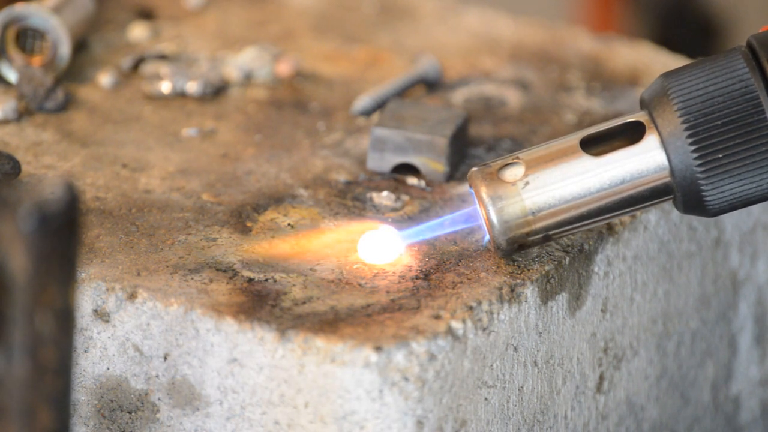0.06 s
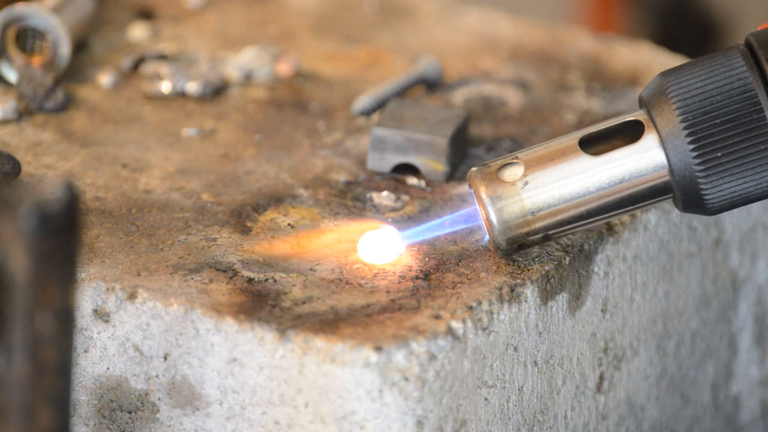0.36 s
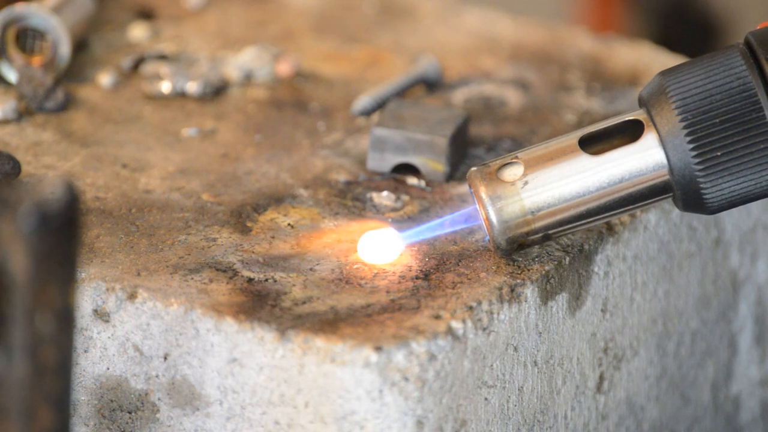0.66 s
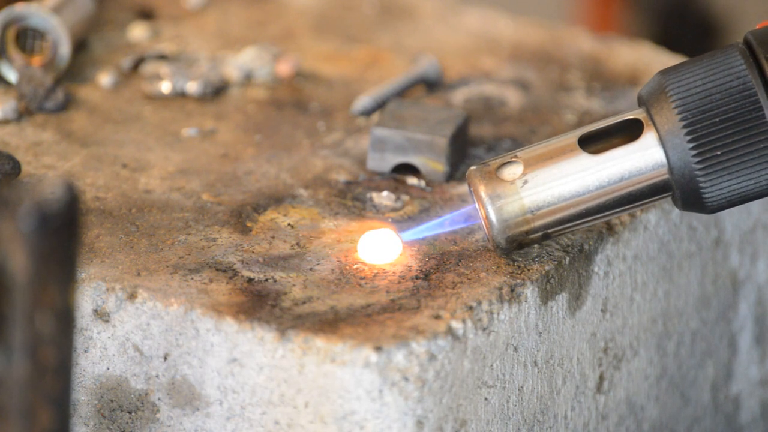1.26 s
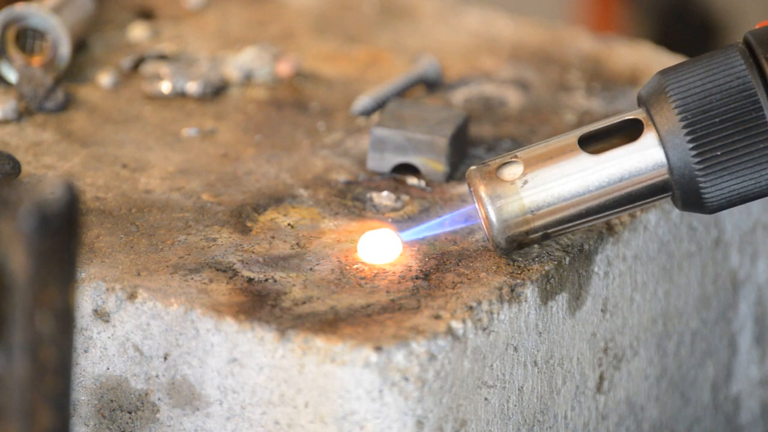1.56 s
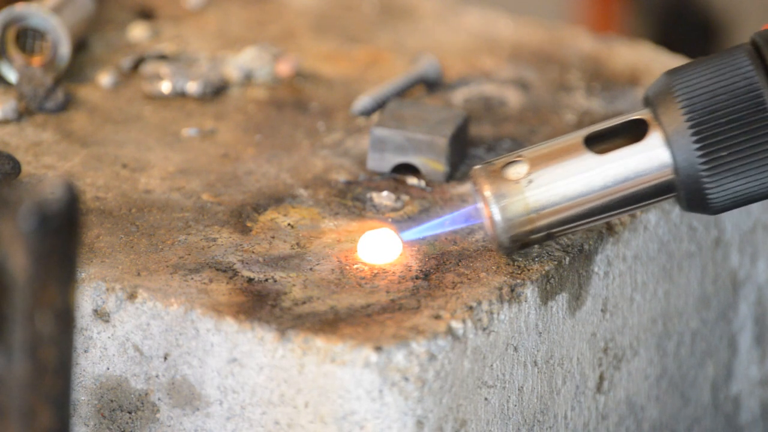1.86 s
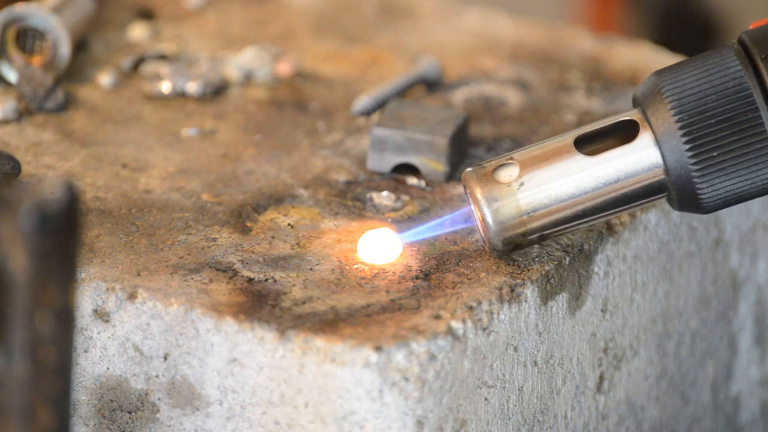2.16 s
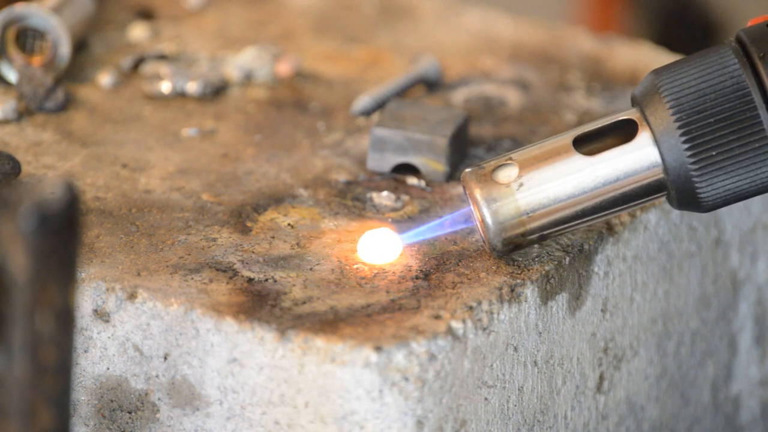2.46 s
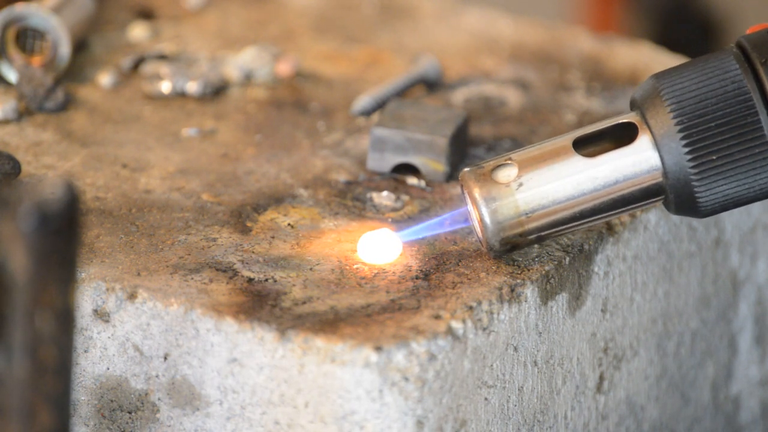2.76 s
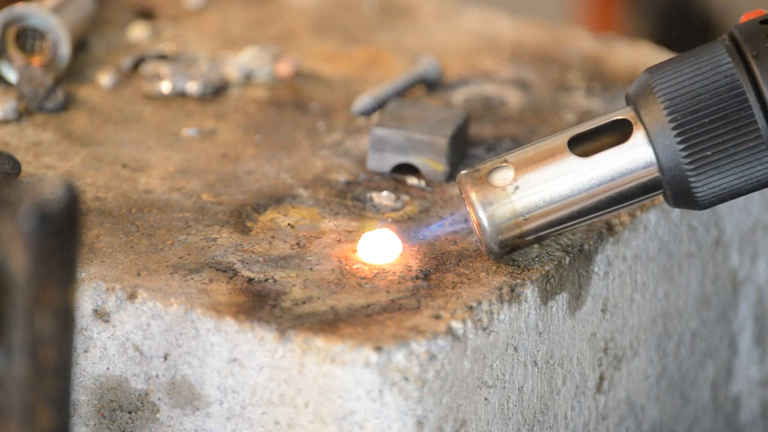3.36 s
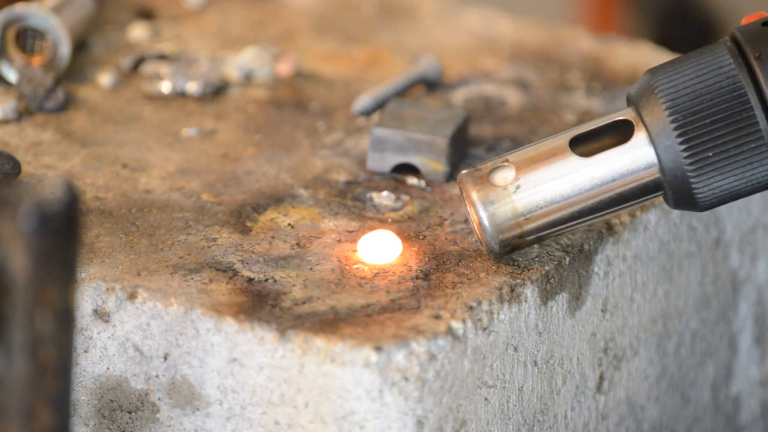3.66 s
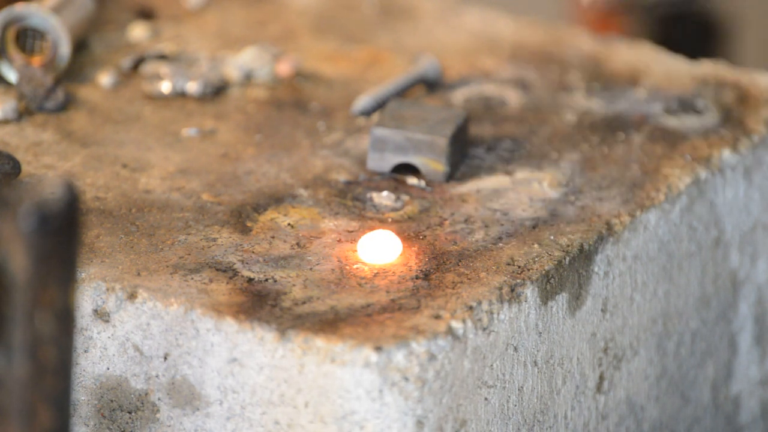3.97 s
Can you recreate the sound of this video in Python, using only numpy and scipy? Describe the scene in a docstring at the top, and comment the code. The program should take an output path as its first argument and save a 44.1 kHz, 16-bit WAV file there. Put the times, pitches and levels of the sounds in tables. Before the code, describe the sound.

Close up in a workshop, a gas torch flame rushes, eases to a steady hiss, swells briefly and slowly grows rougher. A sharp metallic click and a small pop end it, leaving quiet ventilation and a low hum.

```python
"""A handheld butane torch heats a bead of metal on a block, close to a mono microphone in a workshop.
From the start, over ventilation and a low hum, the gas jet hisses through the resonant burner tube
and the flame rushes loudly where it spills over the bead. Within a second it settles; it flares
briefly at 1.7 s, then slowly builds a roar. At 3.3 s the valve snaps shut and the flame pops out,
leaving the ventilation and the hum."""
import sys
import numpy as np
from scipy import signal
from scipy.fft import rfft, irfft
from scipy.io import wavfile

SR = 44100
rng = np.random.default_rng(int(sys.argv[2]) if len(sys.argv) > 2 else 0)


def generate_wav(signal):
    """Clip the signal to [-1, 1] and save it as 16-bit WAV at the path in sys.argv[1]."""
    frames = np.transpose(np.atleast_2d(signal))
    scaled = np.clip(frames, -1, 1) * 32767
    pcm = np.round(scaled).astype(np.int16)
    wavfile.write(sys.argv[1], SR, pcm)


N = 176400
T = np.arange(N) / SR
HZ = np.maximum(np.arange(N // 2 + 1) * SR / N, 1)
STOP_S, SHUT_S = 3.3238, 3.325  # the valve hits its stop; the gas is cut


def from_db(db):
    """Amplitude grows tenfold for every 20 dB."""
    return 10 ** (np.asarray(db) / 20)


def level(rows):
    """An envelope: gain interpolated in decibels over time."""
    return from_db(np.interp(T, *np.transpose(rows)))


def colour(points):
    """A spectral envelope: gain interpolated in decibels over log frequency."""
    hz, db = np.transpose(points)
    return from_db(np.interp(np.log(HZ), np.log(hz), db))


def bell(hz, width):
    """The Lorentzian curve of one resonance, 1 at its peak."""
    return 1 / (1 + (2 * (HZ - hz) / width) ** 2)


def resonances(rows):
    """Peaks and notches in cascade: their decibels add."""
    return from_db(sum(db * bell(hz, width) for hz, width, db in rows))


def noise(response):
    """Source and filter: white noise shaped by a frequency response, at unit power."""
    shaped = irfft(rfft(rng.standard_normal(N)) * response, N)
    return shaped / np.sqrt(np.mean(shaped ** 2) + 1e-20)


def flutter(depth_db, corner_hz=32):
    """Random amplitude modulation: a gain that wavers with low-passed noise."""
    return from_db(depth_db * noise(bell(0, 2 * corner_hz)))


def fade(start, db_per_s):
    """Full level until the start, then exponential decay."""
    return from_db(-db_per_s * np.maximum(T - start, 0))


def decay(start, t60):
    """Free decay: a sudden onset, then a fall of 60 dB every t60 seconds."""
    return (T >= start) * 1000. ** (-np.maximum(T - start, 0) / t60)


def mode(start, hz, t60):
    """A struck mode vibrates as a damped sinusoid."""
    return decay(start, t60) * np.sin(2 * np.pi * hz * (T - start))


def workshop():
    """Ventilation gives broadband noise; its fan motor hums in narrow, wavering bands."""
    # motor hum: (frequency [Hz], width [Hz], level [dB])
    hum_bands = [(57.5, 4.5, -88), (121.3, 4.4, -71), (233, 19, -75)]
    # ventilation spectrum: (frequency [Hz], relative level [dB])
    spectrum = [(20, -18), (42, -8.5), (60, 2), (110, 1), (165, -3.5), (240, -0.5), (400, -3.5), (600, -5),
                (880, -1), (1400, -4.5), (1850, -5), (2300, -11), (3700, -15.5), (7500, -17), (9600, -15),
                (12000, -22.5), (15500, -29)]
    hum = sum(from_db(db) * noise(bell(hz, width)) for hz, width, db in hum_bands)
    return hum + from_db(-59.5) * flutter(depth_db=0.7) * noise(colour(spectrum))


def bench_reflections(echo_db=-13, decay_s=.016, ceiling_db=3):
    """Interference of direct sound with echoes from block and bench ripples the spectrum."""
    echoes = rng.standard_normal(N) * np.exp(-T / decay_s)
    echoes /= np.linalg.norm(echoes)
    ripple = np.abs(1 + from_db(echo_db) * rfft(echoes))
    return np.minimum(ripple, from_db(ceiling_db))


def burner_tube():
    """Resonances of the tube and the space round it filter the jet and the flame."""
    # lower resonances: (frequency [Hz], width [Hz], gain [dB])
    low_modes = [(655, 18, 4), (722, 17, 4), (928, 19, 4.5), (1023, 19, 5), (1087, 34, 7), (1200, 33, 4),
                 (1348, 27, 10), (1509, 27, 11), (1600, 11, 10), (1666, 17, 8), (1713, 20, 8),
                 (1790, 25, -10), (1820, 18, 6.5), (1940, 17, -5), (2164, 39, 9), (2318, 29, 10.5),
                 (2430, 32, 3.5), (2695, 65, 8), (2906, 44, 11.5), (3080, 19, 9), (3207, 91, 8.5),
                 (3340, 40, -4), (3490, 46, 6), (3700, 17, 10), (3900, 45, 11.5), (4120, 93, 4),
                 (4326, 60, -8), (4374, 65, 9), (4790, 42, -3)]
    # upper resonances: (frequency [Hz], width [Hz], gain [dB])
    high_modes = [(5380, 110, 4), (5730, 100, -4.5), (6050, 240, 6), (6240, 80, -4), (6820, 91, 6),
                  (7020, 125, 10), (7360, 82, 6), (7580, 43, 10), (7880, 52, 0), (8140, 97, 8),
                  (9040, 70, 5), (9070, 79, 7.5), (9400, 80, 0), (9870, 106, 10), (10230, 176, 8),
                  (10540, 190, 6), (11230, 180, 6), (11580, 180, 5.5), (11930, 130, -2.5), (12250, 150, 8),
                  (12670, 130, 1), (13950, 150, 4), (15100, 230, 0)]
    return resonances(low_modes) * resonances(high_modes)


def jet_hiss(burner):
    """Turbulence in the gas jet radiates a nearly steady hiss."""
    # hiss envelope: (time [s], level [dB])
    envelope = [(0, -52.5), (.9, -54.5), (1.55, -54.5), (2.2, -54.5), (3.3, -53.5)]
    # hiss spectrum: (frequency [Hz], relative level [dB])
    spectrum = [(250, -22), (900, 1), (1600, -1), (2600, -4.5), (3400, -5.5), (5200, -7), (7000, -0.5),
                (10400, -4), (11700, -8), (13000, -20), (15500, -17)]
    return level(envelope) * flutter(depth_db=0.59) * noise(colour(spectrum) * burner)


def flame_rush(burner):
    """Flow over an obstacle is turbulent: the flame rushes as it spills over the bead."""
    # rush envelope: (time [s], level [dB])
    envelope = [(0, -42.5), (.14, -44.8), (.24, -46), (.36, -45), (.56, -46), (.71, -48.5), (.78, -56),
                (.89, -71), (2.1, -80), (3.3, -62)]
    # rush spectrum: (frequency [Hz], relative level [dB])
    spectrum = [(250, -13.5), (500, -4.5), (1000, -4.5), (2000, 0.5), (3000, -0.5), (5000, -2), (7000, -4),
                (10500, -7.5), (11700, -10), (13000, -24), (15500, -19)]
    return level(envelope) * flutter(depth_db=0.9) * noise(colour(spectrum) * burner)


def cone_roar(burner):
    """Combustion noise of the flame cone: a midrange roar that sinks away and builds again."""
    # roar envelope: (time [s], level [dB])
    envelope = [(0, -59), (.23, -54), (.36, -50.5), (.7, -51), (.9, -74), (1.6, -87), (2.0, -62),
                (2.5, -56), (2.8, -56.5), (3.05, -53), (3.3, -56.5)]
    # roar spectrum: (frequency [Hz], relative level [dB])
    spectrum = [(250, -46), (600, -7.5), (1000, -2.5), (1600, 0), (2400, 1), (3000, -5), (4000, -11),
                (6000, -28)]
    return level(envelope) * flutter(depth_db=0.5) * noise(colour(spectrum) * burner)


def flame_tongue(burner):
    """Turbulence in the yellow tongue beyond the bead blusters until the tongue draws in."""
    return from_db(-57.5) * fade(0.38, db_per_s=92) * noise(bell(hz=680, width=790) * burner)


def flame_buffet(peak_s=0.36, spread_s=0.086):
    """Narrowband noise beats irregularly: a soft bass flutter of the flame at its widest."""
    swell = np.exp(-((T - peak_s) / spread_s) ** 2)
    return from_db(-60) * swell * noise(bell(hz=233, width=28))


def jet_flare(burner, peak_s=1.706, hold_s=.14, rise_db_per_s=250):
    """Turbulent noise swells briefly as the tip dips towards the work."""
    # flare spectrum: (frequency [Hz], relative level [dB])
    spectrum = [(500, -8), (1500, -1), (3000, -1), (5500, -0.5), (7500, -2.5), (10800, -6), (13000, -21),
                (15500, -22)]
    rise = from_db(-56.5 - rise_db_per_s * np.maximum(peak_s - T, 0))
    return rise * fade(peak_s + hold_s, db_per_s=123) * noise(colour(spectrum) * burner)


def flame():
    """Five noise sources drive one resonator and die together when the gas is cut."""
    burner = burner_tube() * bench_reflections()
    sources = jet_hiss, flame_rush, cone_roar, jet_flare, flame_tongue
    return sum(source(burner) for source in sources) * fade(SHUT_S, db_per_s=251)


def valve_contacts(body):
    """A few quick impacts excite the resonances of the torch body; the last burst, some 6 ms after the stop, is
    their echo off the bench."""
    # contacts, the last row their echo off the bench: (time [s], level [dB])
    contacts = [(3.3229, -31), (3.3245, -22.5), (3.3268, -30), (3.3297, -26)]
    # contact spectrum: (frequency [Hz], relative level [dB])
    spectrum = [(800, -21), (1500, -21), (2700, -30), (4600, -11.5), (7900, -7.5), (8700, -3), (10300, 1),
                (11600, -12), (13000, -10), (14000, -27), (15500, -28)]
    return sum(from_db(db) * decay(s, t60=0.017) * noise(colour(spectrum) * body) for s, db in contacts)


def valve_stop():
    """A brief impact has a broad spectrum: the valve hits the end of its travel."""
    # impact spectrum: (frequency [Hz], relative level [dB])
    spectrum = [(800, -24), (2000, -12), (3800, -14), (6000, -13), (8000, -10), (10300, 3), (11500, -3),
                (12600, 6), (13400, 1), (14100, -20), (15500, -23)]
    return from_db(-19.5) * decay(STOP_S, t60=.008) * noise(colour(spectrum))


def metal_ring():
    """Free vibration: the stop starts the latch's modes in alternate directions; the tube rings on."""
    # latch modes: (frequency [Hz], level [dB], T60 [s])
    latch_modes = [(1180, -40, .015), (2300, -40, .015), (3280, -36, .022), (3830, -35, .028),
                   (4470, -41, .02), (8900, -26, .016), (10250, -24, .012), (12450, -21, .009),
                   (12950, -19, .009)]
    # burner tube ring: (frequency [Hz], width [Hz], level [dB], T60 [s])
    tube_bands = [(3930, 150, -53, 0.35), (7930, 130, -58, .25), (12600, 260, -49, 0.22)]
    latch = sum((-1) ** k * from_db(db) * mode(STOP_S, hz, t60)
                for k, (hz, db, t60) in enumerate(latch_modes))
    tube = sum(from_db(db) * decay(SHUT_S, t60) * noise(bell(hz, width))
               for hz, width, db, t60 in tube_bands)
    return latch + tube


def room_tail(body, ring_share=0.61, split_hz=7300):
    """Reverberation carries part of the body's ring and lasts longer in the lows."""
    # reverberation spectrum: (frequency [Hz], relative level [dB])
    spectrum = [(300, -18), (950, -17), (1700, -3.5), (2900, -13), (4300, -2.5), (5200, -5), (7400, -2.5),
                (8700, 4), (10600, 3), (11700, -2.5), (13000, -5), (14000, -12), (15500, -15)]
    room = colour(spectrum) * body ** ring_share
    low_share = 1 / (1 + (HZ / split_hz) ** 2)
    low = from_db(-43) * decay(SHUT_S, t60=0.39) * noise(room * low_share)
    high = from_db(-39) * decay(SHUT_S, t60=0.25) * noise(room * (1 - low_share))
    return low + high


def valve(low_cut_hz=510):
    """Impacts, reverberation and ringing metal superpose in one high-passed snap."""
    # torch body resonances: (frequency [Hz], width [Hz], gain [dB])
    body_modes = [(3250, 180, 4), (3890, 280, 17), (6520, 240, 10), (8650, 200, 9), (8950, 180, 8),
                  (9440, 130, 8), (10000, 130, 3), (12900, 600, 12)]
    body = resonances(body_modes)
    snap = valve_stop() + valve_contacts(body) + room_tail(body) + metal_ring()
    return signal.sosfilt(signal.butter(2, low_cut_hz, "high", fs=SR, output="sos"), snap)


def flame_pop():
    """Air column resonance: the collapsing flame rings the tube with a puff and a clean note."""
    puff = from_db(-51.5) * decay(SHUT_S, t60=0.3) * noise(bell(hz=1290, width=220))
    return puff + from_db(-53) * mode(SHUT_S, hz=1213, t60=0.36)


def scene():
    """Sound pressures add at one microphone, which feeds both channels."""
    return np.tile(flame() + flame_buffet() + valve() + flame_pop() + workshop(), (2, 1))


def record(dry):
    """An elliptic low-pass filter limits the bandwidth steeply."""
    cutoff_hz = 15720
    return signal.sosfilt(signal.ellip(10, .1, 70, cutoff_hz, fs=SR, output="sos"), dry)


dry = scene()
out = record(dry)
generate_wav(out)
```